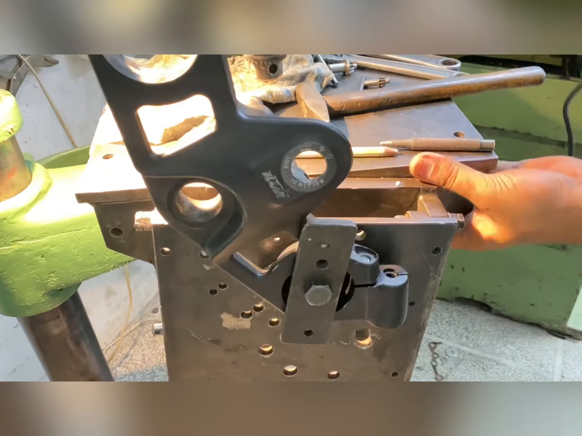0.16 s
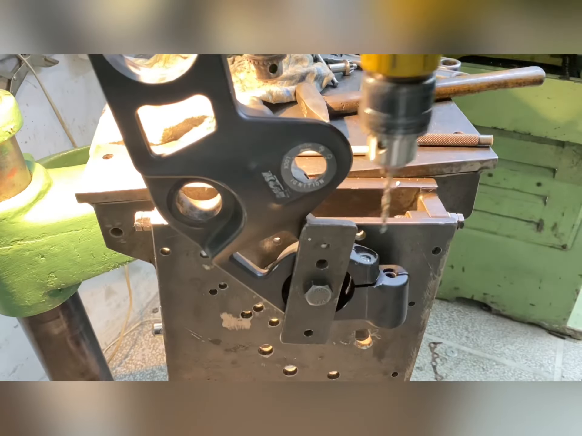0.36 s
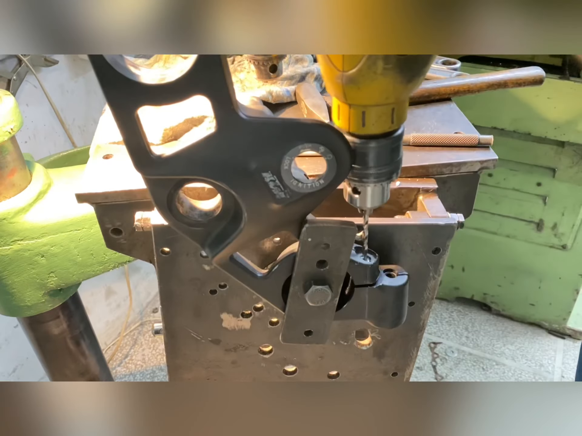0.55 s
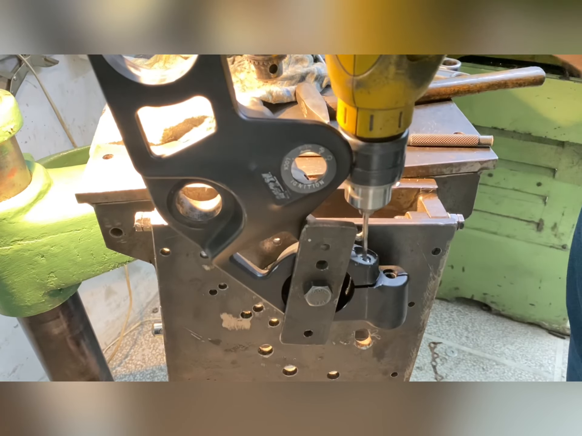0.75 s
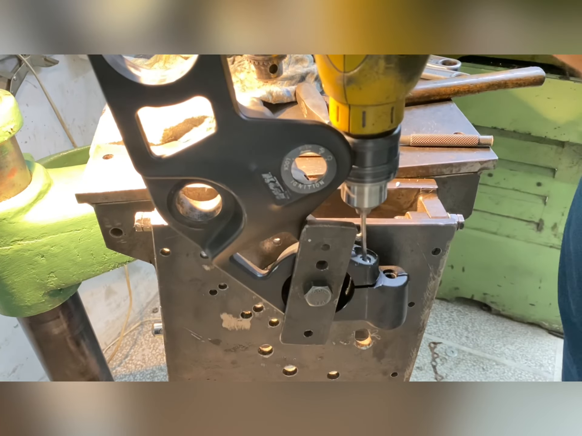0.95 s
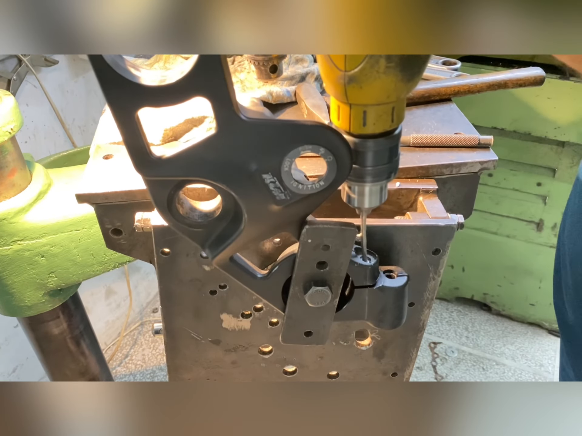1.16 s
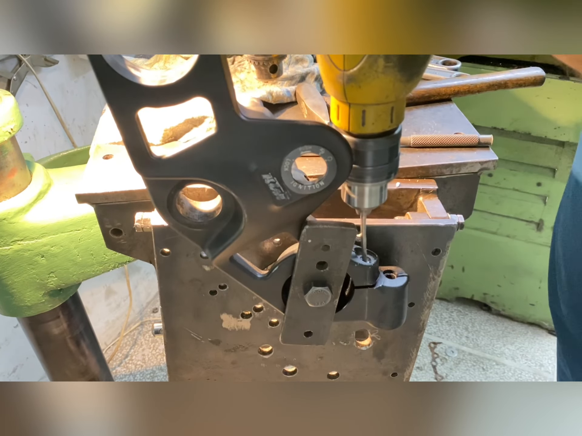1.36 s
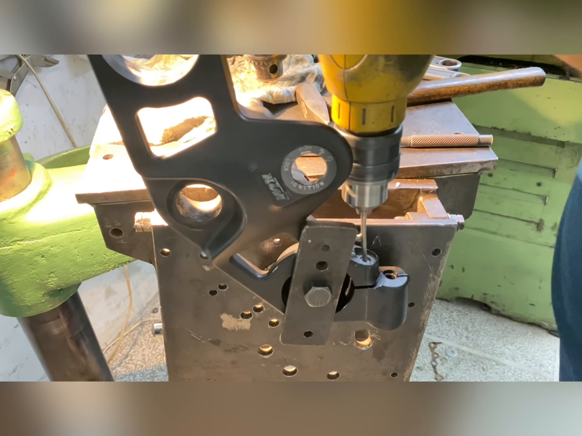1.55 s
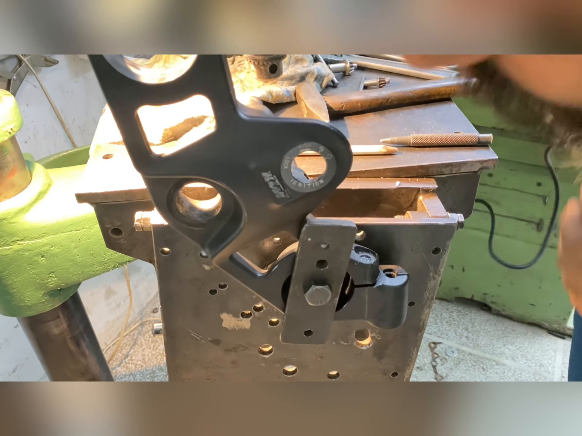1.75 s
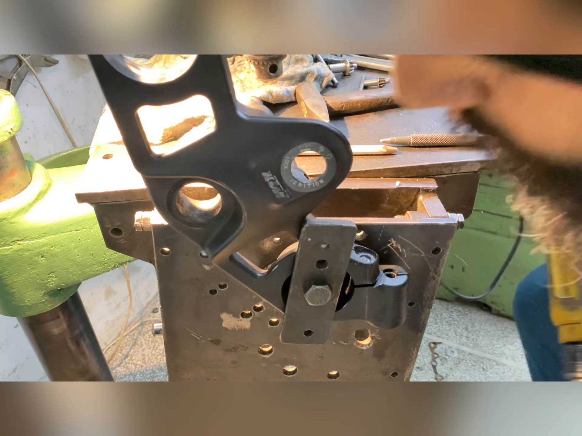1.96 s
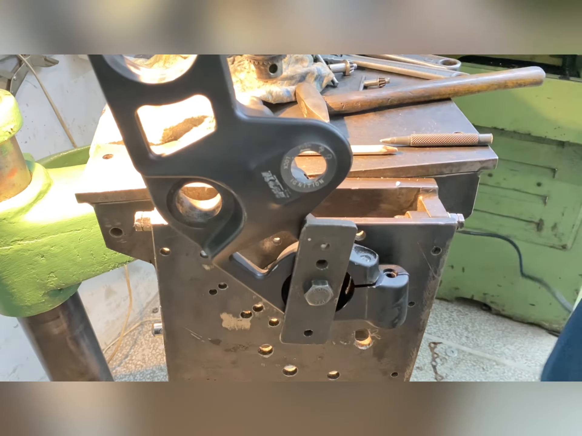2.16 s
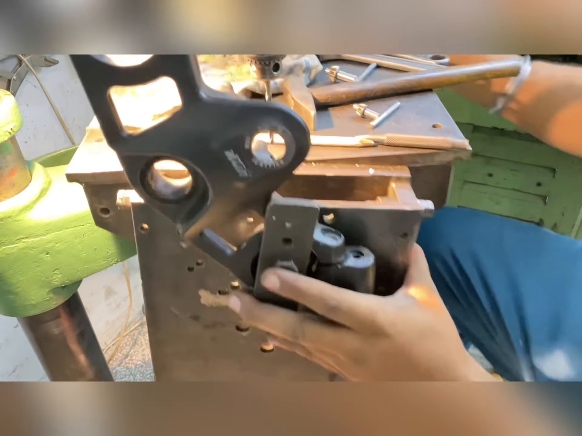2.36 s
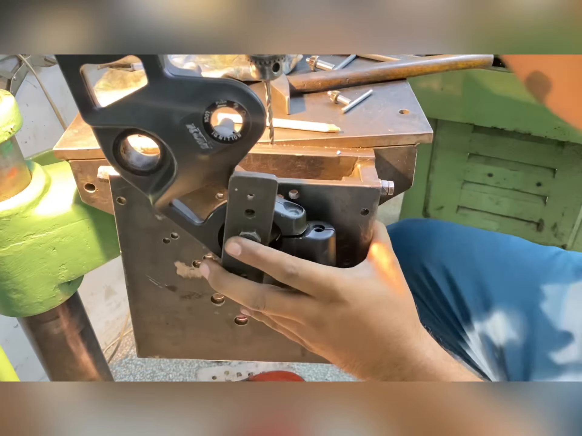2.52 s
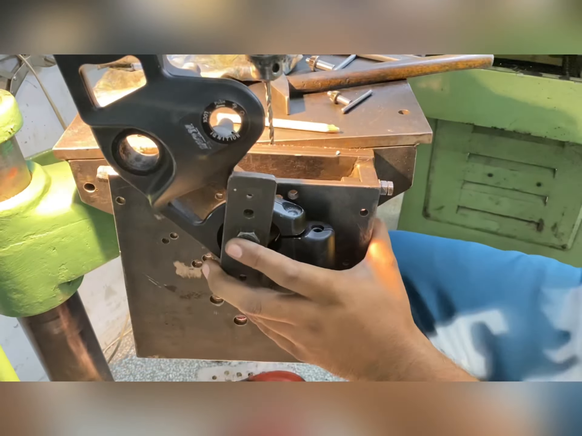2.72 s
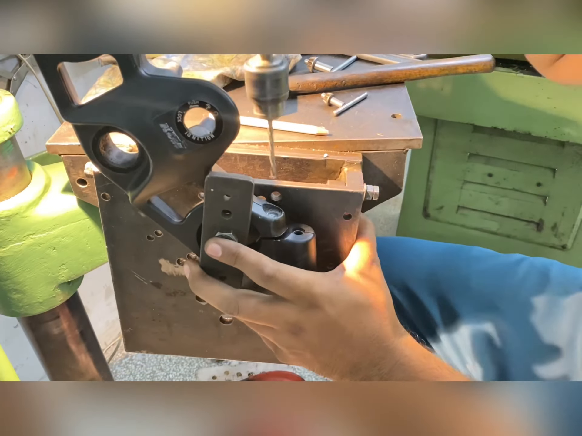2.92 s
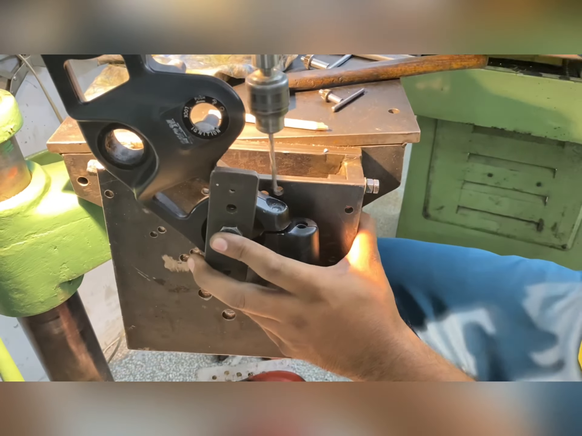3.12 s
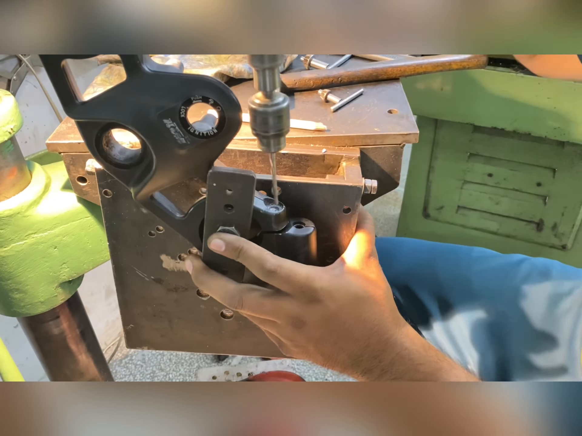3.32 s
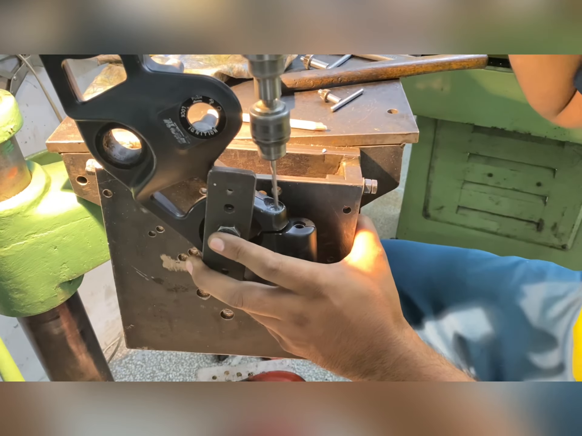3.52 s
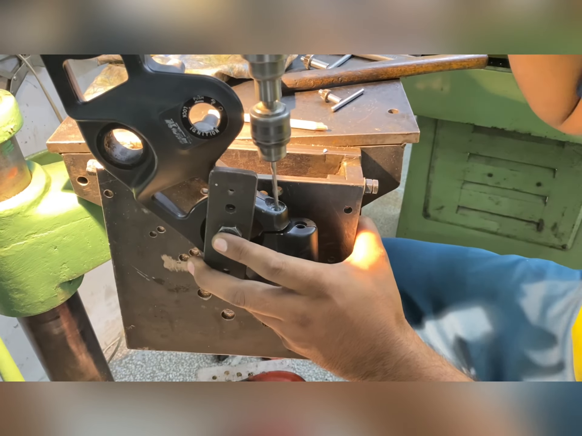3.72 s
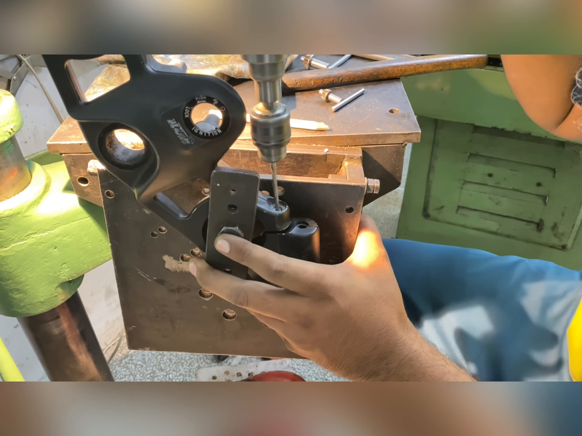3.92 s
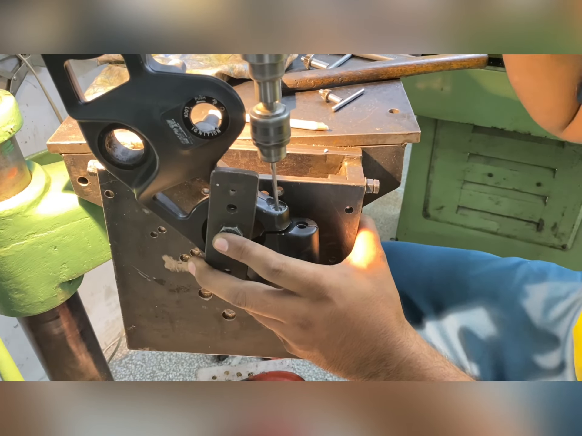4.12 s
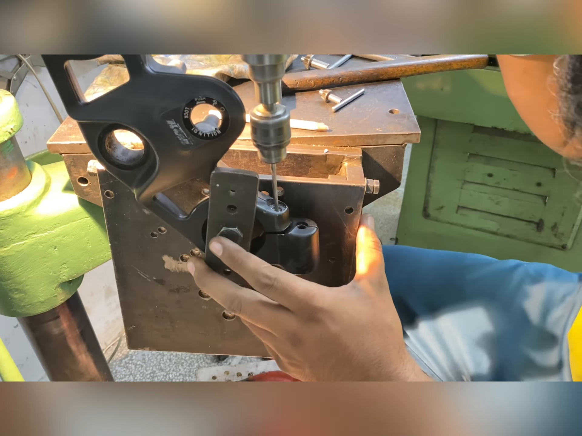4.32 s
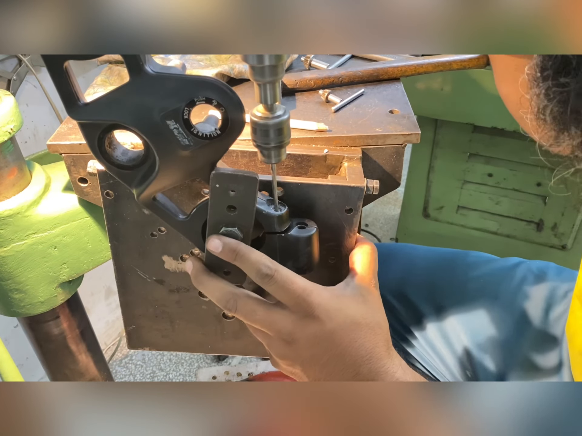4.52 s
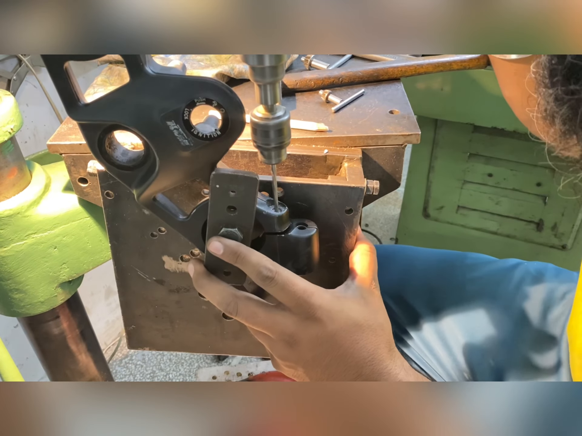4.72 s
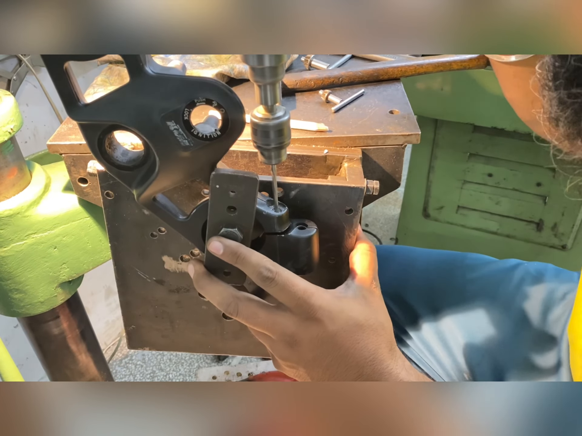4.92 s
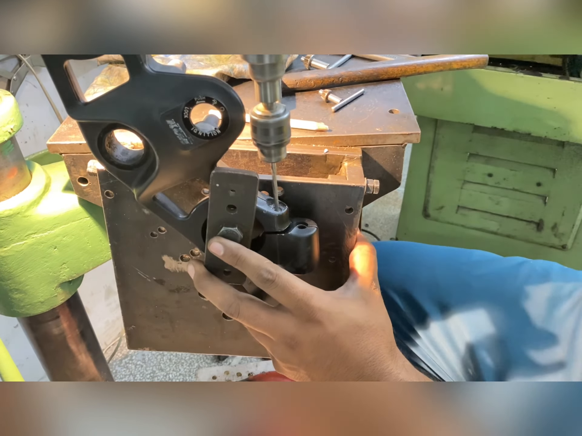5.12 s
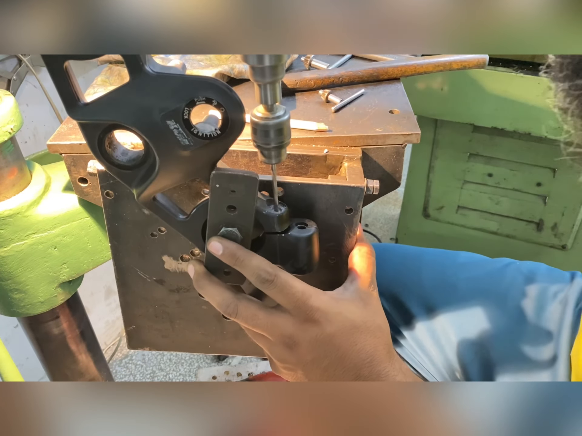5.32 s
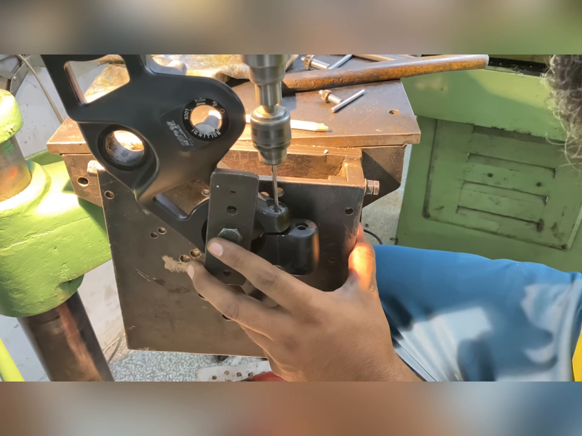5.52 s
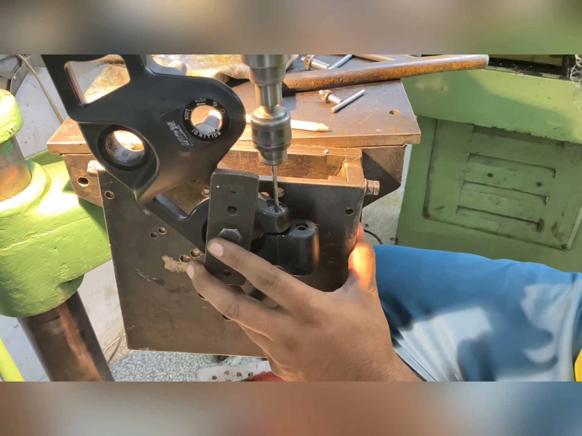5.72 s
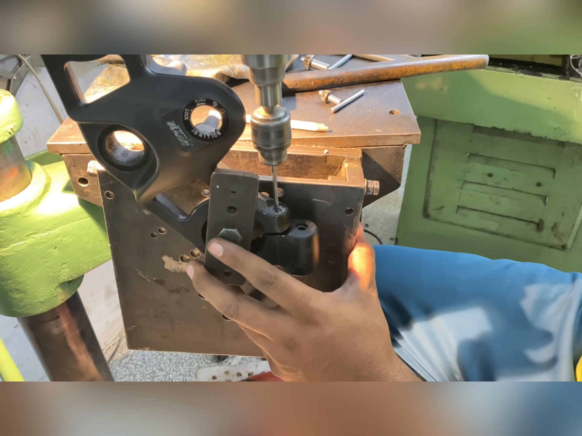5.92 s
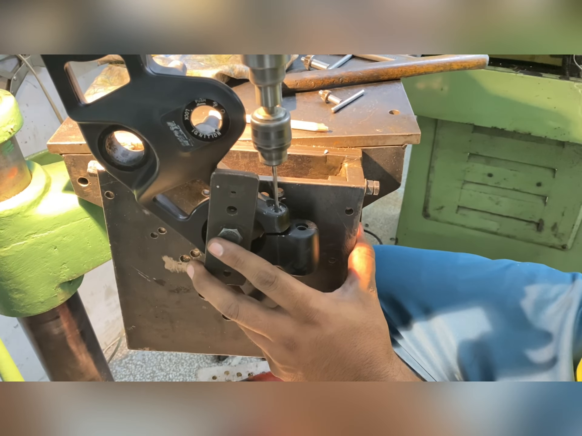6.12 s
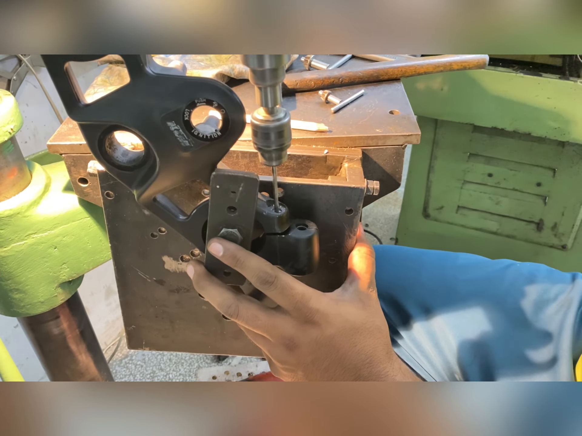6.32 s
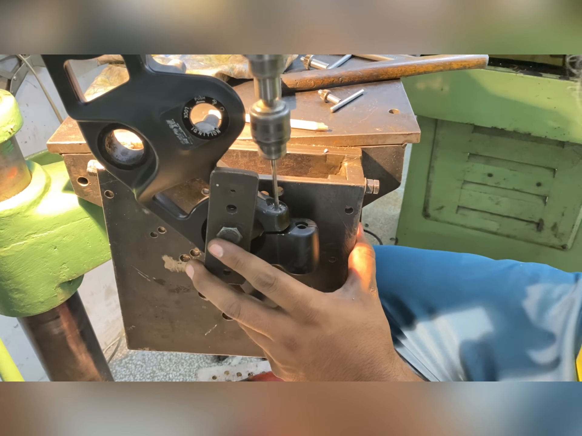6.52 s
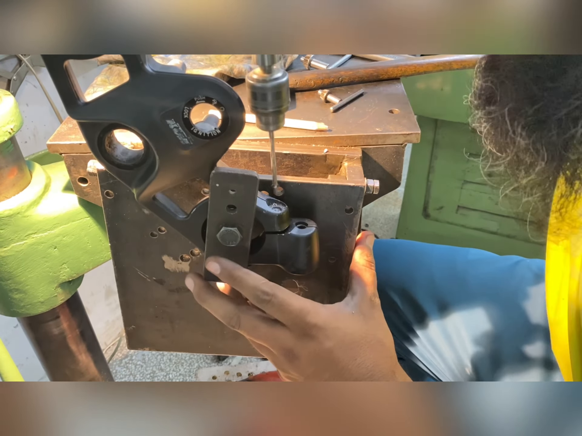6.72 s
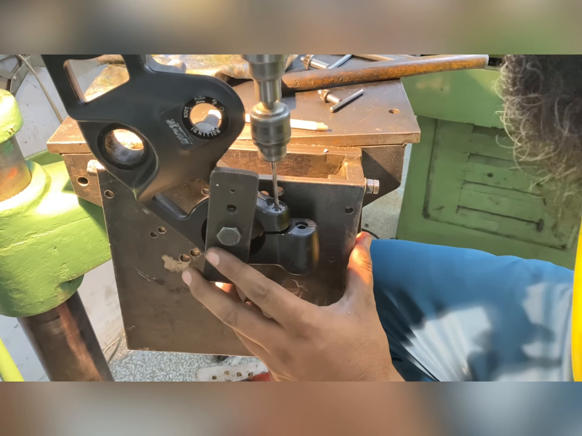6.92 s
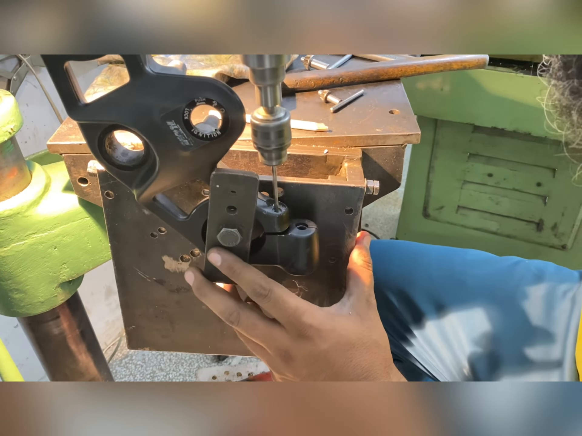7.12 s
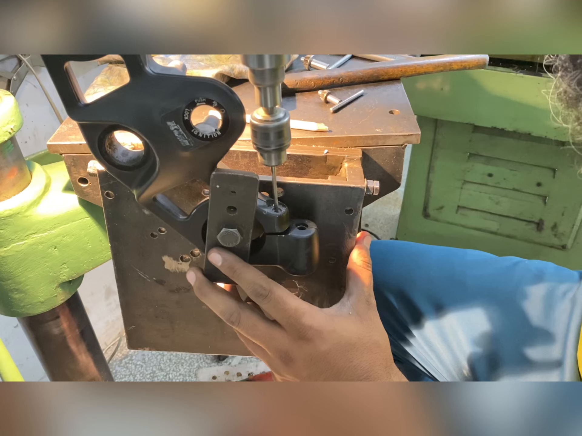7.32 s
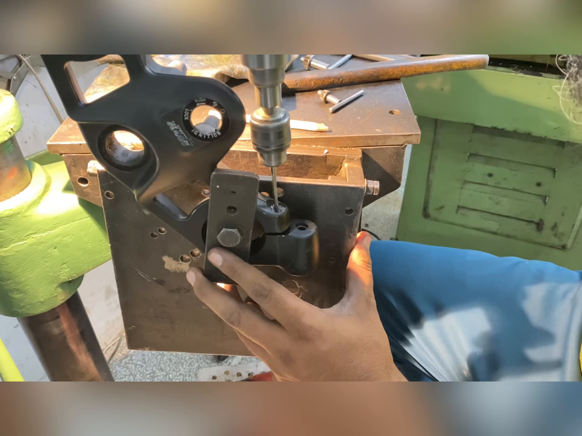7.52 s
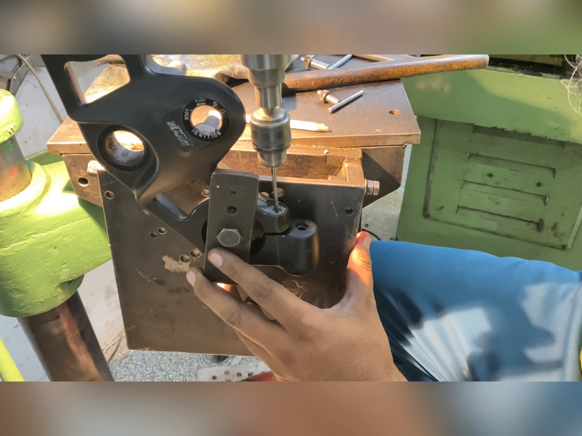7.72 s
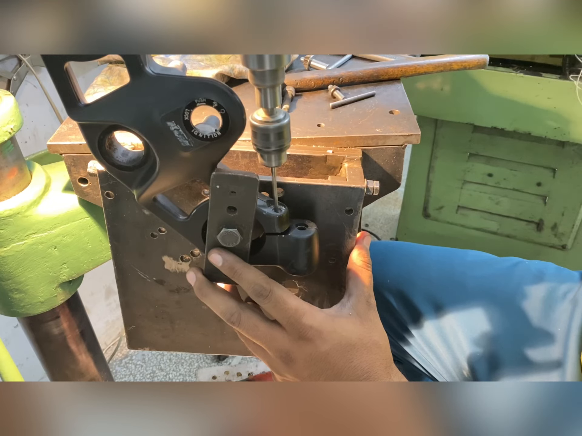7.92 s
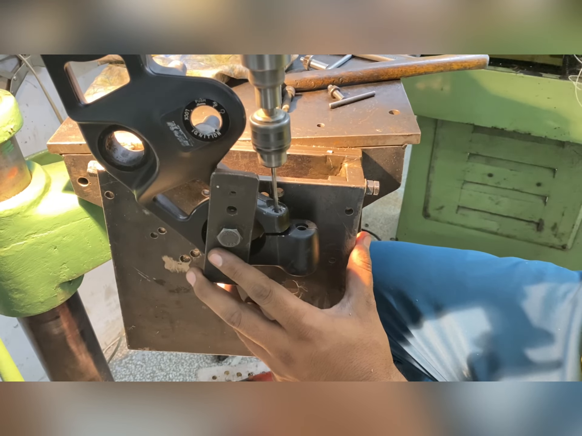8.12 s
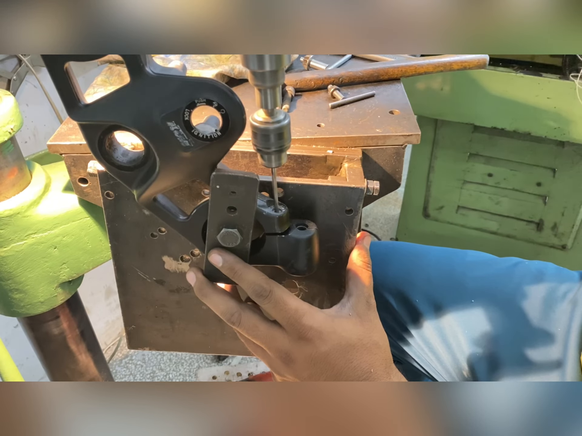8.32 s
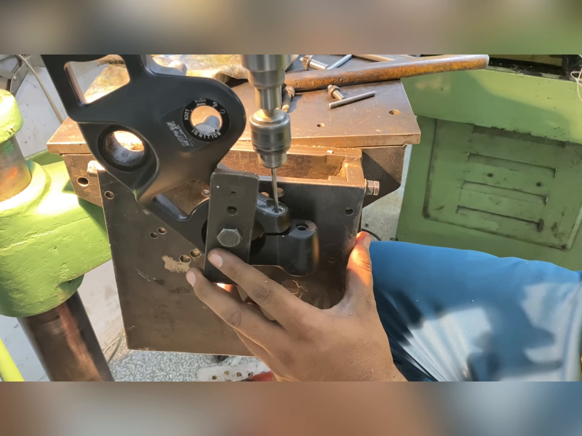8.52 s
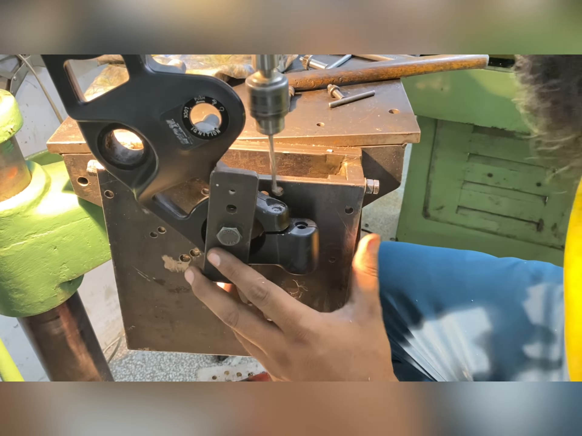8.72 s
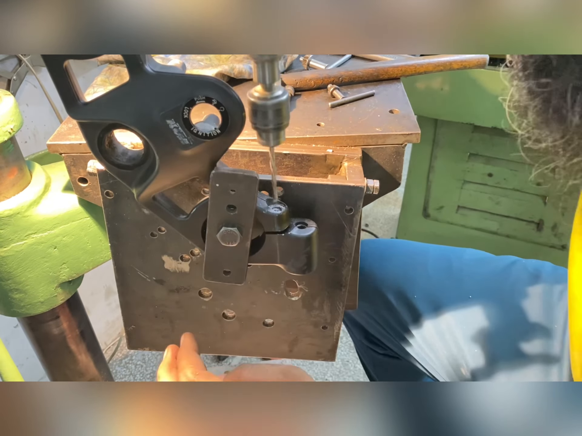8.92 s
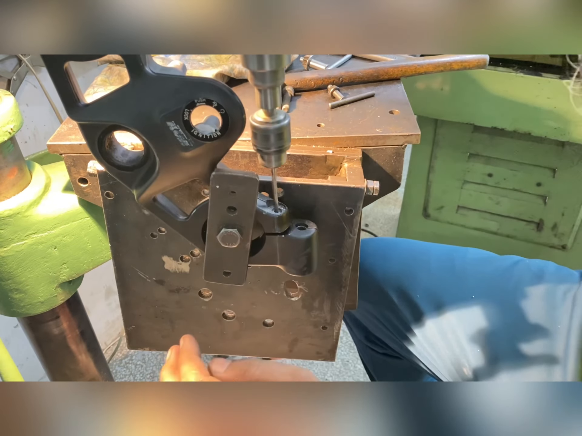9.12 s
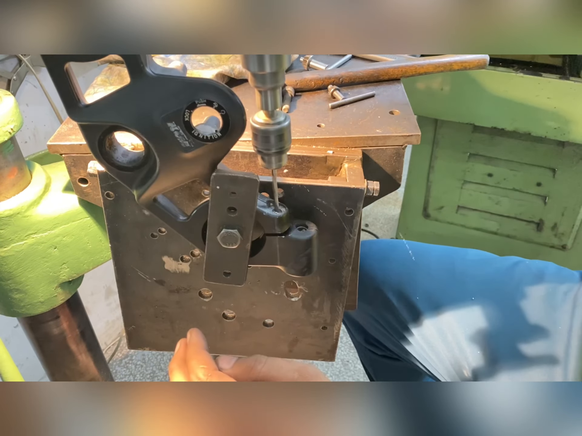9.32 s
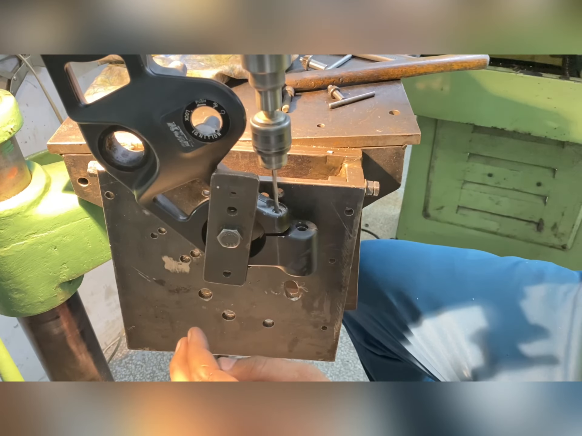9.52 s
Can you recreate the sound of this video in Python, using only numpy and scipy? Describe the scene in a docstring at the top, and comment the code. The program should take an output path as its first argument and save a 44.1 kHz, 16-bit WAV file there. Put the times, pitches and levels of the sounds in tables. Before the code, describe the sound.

Close, bright and nearly dry workshop sound with little bass over a faint, restless background. A tiny scrape and click open it. At about 0.7 s a cordless drill creeps, then snags on steel from 0.8 to 1 s with sharp scratches and squeaks. It spins up into a gritty geared whir with a thin whistle, lets go at 1.6 s and coasts down in pitch until about 2.3 s, with knocks and clicks around 1.8-2.1 s. More clicks come at 2.5-2.7 s; at 2.75 s a switch snaps and a drill press hums steadily, with fine whine and faint belt chirp. Light ticks sound near 4 s, a soft scrape swells from 4.5 s, and sharper ticks come at 5-5.5 s. Loud, shrill, ringing chatter in rapid irregular bites fills 5.7-6.5 s, then 7-8.6 s, then 9.1 s to the end, with the quieter hum between.

```python
"""A bench drill press hums close by: its two-flute bit ticks, scrapes, then chatters in three shrill spells,
each bite being a noise burst that rings the resonances of the bit and the clamped part.
Before it, a cordless drill snags on steel, spins up and coasts: gear noise and tones follow a mesh pitch.
Knocks, clicks and squeaks are short bursts through resonances; a restless shop background lies beneath."""
import sys
import numpy as np
from scipy import signal
from scipy.fft import rfft, irfft, next_fast_len
from scipy.io import wavfile
from scipy.ndimage import uniform_filter1d, map_coordinates

SR = 44100
rng = np.random.default_rng(int(sys.argv[2]) if len(sys.argv) > 2 else 0)


def put_to_file(sound):
    """Save the sound as 16-bit audio at rate SR, in the file named by the first command-line argument."""
    columns = np.atleast_2d(sound).T  # one column per channel
    safe = np.clip(columns, -1, 1)
    whole_steps = np.round(safe * 32767)
    wavfile.write(sys.argv[1], SR, whole_steps.astype(np.int16))


N = 421596
T = np.arange(N) / SR  # time of each sample, s
TOP_HZ = 15800  # upper limit of the tones and of the microphone

# All table levels are relative: the functions below apply further gains.
# Background spectrum: (f/Hz, spectral level/dB)
SHOP_SPECTRUM = [(24, -24), (100, -27), (166, -13), (203, -16.5), (242, -5), (335, -9.5), (567, -6.5),
                 (785, -11.5), (1060, -3.5), (2610, -12), (9000, -14), (12600, -21.5), (15800, -26)]
# Background level over time: (t/s, level/dB)
SHOP_LEVEL = [(0, -46.5), (.65, -44.5), (1.2, -38), (1.8, -44), (2.25, -40.5), (2.55, -42.5), (2.75, -45),
              (3, -47), (9.56, -48.5)]
# Brief dips of the background: (t/s, half length/s, change of level/dB)
SHOP_DIPS = [(2.227, 0.0059, -11), (2.608, 0.038, -9)]
# Steady tones of the shop: (f/Hz, level/dB relative to the background)
SHOP_HUM = [(243, -18), (371, -24.5), (436, -21), (526, -20), (790, -20.5), (872, -21), (1047, -18)]
# Left-right likeness of background, press and clicks: (f/Hz, correlation)
LIKENESS = [(60, 0.74), (150, 1), (380, 0.86), (950, 0.99), (2380, 0.29), (5980, -0.14), (15000, 0.62)]

# Bumps on the table: (t/s, level/dB, length/s, centre f/Hz)
KNOCKS = [(1.773, -37.5, 0.047, 746), (1.949, -37.5, 0.036, 565), (2.054, -35, 0.041, 430),
          (2.566, -31.5, 0.0068, 170)]
# Table resonances: (f/Hz, width/Hz, level/dB)
TABLE_MODES = [(302, 210, -2), (426, 110, 3), (710, 200, -2), (1030, 170, -2), (1415, 110, 3),
               (1760, 140, -9), (2180, 260, -2.5), (2920, 1300, -8)]
KNOCK_FALL_DB_PER_OCTAVE = 5.5  # either side of a blow's centre
# Groans of the fixture under the feed: (t/s, level/dB, length/s, f/Hz, width/Hz)
GROANS = [(3.97, -46, 0.14, 312, 20), (5.502, -39, 0.1, 434.4, 8), (5.516, -42, 0.079, 378, 15)]
# Squeaks of steel sliding on steel: (t/s, level/dB, length/s, f/Hz, width/Hz, glide/Hz)
SQUEAKS = [(.01, -51.5, 0.093, 4890, 250, -250), (0.03, -44, 0.032, 14350, 200, 0),
           (0.092, -49, .055, 14000, 200, 0), (0.778, -22, 0.009, 6740, 400, 1000),
           (0.789, -11, .004, 9200, 100, 0), (0.959, -32, 0.013, 5000, 200, 100),
           (0.794, -23, 0.007, 4950, 250, 100), (0.806, -11.5, 0.0053, 11750, 151.5, 100),
           (0.82, -28, 0.0058, 6470, 202, -250), (0.938, -34.5, 0.062, 3050, 262, -7),
           (2.106, -41.5, .059, 6680, 49, -2), (2.108, -43, .043, 11070, 90, -5),
           (2.695, -43, 0.048, 4600, 200, 445)]
# Sharp steel contacts and the switch: (t/s, level/dB, length/s)
CLICKS = [(.03, -45.5, 0.12), (.363, -41, 0.013), (1.78, -37, 0.025), (1.955, -39, 0.035),
          (2.062, -37.5, 0.026), (2.485, -31, 0.0086), (2.559, -24.5, 0.0062), (2.646, -32, 0.012),
          (2.748, -23, 0.0044), (2.754, -33.5, 0.041), (3.017, -32.5, .005)]
# Broad spectrum of clicks and ticks: (f/Hz, spectral level/dB)
CLICK_SPECTRUM = [(300, -28), (1500, -7), (4500, 4.5), (8000, 3.5), (12000, 2), (15800, 0)]

# Cordless drill's gear tones: (multiple of the mesh pitch, level/dB)
GEAR_ORDERS = [(1, -12.5), (4, -12)]
# Rough, smeared overtone of the gears: (multiple of the mesh pitch, level/dB)
GEAR_BUZZ = [(4.35, -10)]
# Thin whistle of the rotor: (multiple of the mesh pitch, level/dB)
ROTOR_ORDERS = [(8, -53), (12, -43), (24, -47), (36, -55)]
# Spectrum of the gear noise: (f/Hz, spectral level/dB)
GEAR_SPECTRUM = [(180, -48), (300, -32), (360, -25), (469, -35), (527, -26), (839, -42), (1210, -18),
                 (1310, -11), (3610, -2), (4950, 2), (8550, -4.5), (12700, 1.5), (15800, -10)]
# Left-right likeness of the cordless drill: (f/Hz, correlation)
GEAR_LIKENESS = [(60, 0.95), (240, 0.96), (950, 1), (3770, 0.079), (15000, 0.89)]
# The cordless bit catches on the hole's rim: (t/s, level/dB, length/s)
SNAGS = [(.775, -20, 0.012), (.788, -20.5, 0.018), (.806, -28.5, 0.046), (.842, -30, 0.031),
         (.884, -25, 0.02), (.908, -21.5, 0.018), (.938, -24, 0.0081), (.959, -22, 0.017)]
# Resonances excited by the snags: (f/Hz, width/Hz, level/dB)
SNAG_MODES = [(3100, 130, -8.5), (4940, 74, -10), (6100, 140, -15), (7750, 150, -8), (9060, 75, -2),
              (9500, 89, -9), (11560, 110, -2), (11920, 130, 0), (13500, 90, -9), (14800, 100, -13)]
# Broad spectrum of the snags: (f/Hz, spectral level/dB)
SNAG_SPECTRUM = [(400, -18), (1200, -9), (2200, 3), (3100, -7), (3800, -23), (6200, 5.5), (8400, -3),
                 (10000, 7), (12500, 5), (14200, -8), (15800, 0)]
TOUCH_S, SQUEEZE_S, LET_GO_S = .668, 0.98, 1.592  # trigger touched, squeezed fully, let go
# mesh pitch when creeping, pitch that full power pulls towards, spin-up time, sag under load
CREEP_HZ, FREE_HZ, SPIN_UP_S, SAG_HZ_PER_S = 596, 1716, .19, 834
COAST_S, FRICTION_HZ_PER_S = .98, 1755  # time constant of the drag, steady braking by friction
# share by which the gear pitch is lowered during the snags; the gear sound gets quieter with it
SNAG_PITCH_DROP = .34
GEAR_DB, GEAR_DB_PER_OCTAVE, COAST_DROP_DB = -28.5, 7.5, 9.5  # at top pitch; growth; drop without power

# Resonances of the switch's steel housing: (f/Hz, width/Hz, level/dB)
SWITCH_MODES = [(1290, 31, -2), (1400, 27, -2), (2170, 83, -1.5), (2670, 80, -3), (3360, 23, -6)]
# Drill press: (t/s, frame rumble level/dB, motor hum level/dB)
PRESS_LEVELS = [(2.82, -50.5, -49), (3.63, -43.5, -42.5), (4.51, -43, -39.5), (5.0, -42.5, -48),
                (5.09, -44, -38.5), (5.69, -43, -46), (5.73, -55, -50), (6.2, -53, -52.5), (7.04, -48, -43),
                (7.36, -49.5, -51), (7.59, -51, -46), (7.78, -58.5, -54.5), (8.41, -48.5, -52),
                (8.49, -54.5, -52), (9.16, -51, -46), (9.56, -60, -60)]
# Octave of the motor hum: (t/s, level/dB)
OCTAVE_LEVEL = [(2.82, -58), (3.3, -53.5), (3.81, -43.5), (4.25, -58), (5.2, -52.5), (5.69, -55),
                (5.75, -61), (7.1, -52), (8.1, -64), (9.05, -59), (9.56, -58)]
# Spectrum of the frame's rumble: (f/Hz, spectral level/dB)
FRAME_SPECTRUM = [(59, -85), (100, -53), (307, -17), (396, -15), (490, -6), (618, -17.5), (1010, -8.5),
                  (1440, -22), (2160, -12.5), (2350, -13), (5140, -15.5), (6220, -14), (6770, -16),
                  (11300, -20), (15800, -23.5)]
# Resonances of the frame: (f/Hz, width/Hz, level/dB)
FRAME_MODES = [(181, 3.9, -33), (206, 9.1, -17), (250.5, 4.9, -1.5), (276.3, 9, 0), (291, 5.4, -13),
               (303.2, 4.5, -3), (314.7, 7.4, -5), (427, 8, -4.5), (458, 9.6, 3), (555, 16, 0), (828, 8, 0),
               (901, 8.3, -2.5), (1009.5, 17, 1.5), (1168, 16, 0), (1223, 17, 1), (1293, 12, 2.5),
               (1356, 24, 1)]
# Bearing and pulley tones: (f/Hz, level/dB, phase flutter/rad)
WHINES = [(315, -57.5, .2), (736, -58.5, .2), (1814, -61, .3), (2988, -61.5, .8), (6412, -52, .4),
          (7650, -62, 1), (10830, -59, .8), (10885, -58.5, .8), (10965, -60, .8), (11488, -62, 1),
          (11832, -58.5, .7), (12312, -56, .8), (14810, -63, 1.2)]

# Lowering of the bit: (t/s, attack/s, hold/s, release/s, scrape level/dB, sizzle level/dB)
FEEDS = [(3.717, 0.087, .2, 0.19, -49, -45), (4.22, .1, 0.081, 0.11, -43.5, -44),
         (4.464, 0.32, .3, 0.28, -38, -35.5), (5.266, 0.27, .15, .03, -33.5, -33.5),
         (5.726, 0.024, 0.74, 0.071, -39, -40.5), (7.009, .01, 1.615, 0.017, -40.5, -42),
         (9.07, .02, 0.44, .05, -44.5, -44)]
# Resonances of the sizzle: (f/Hz, width/Hz, level/dB)
SKIM_MODES = [(4980, 24, -2), (7870, 94, 1.5), (10070, 260, 0.5), (11450, 260, -0.5), (12340, 120, 6),
              (15100, 250, -12)]
# The turning bit touches the steel: (t/s, level/dB, length/s)
TICKS = [(3.856, -30.5, 0.0028), (3.889, -28, .004), (3.906, -34, 0.0027), (3.973, -31, .003),
         (3.991, -24.5, 0.0042), (4.008, -30, .004), (4.041, -29, 0.0033), (4.988, -18, 0.003),
         (5.458, -23, .004), (5.475, -25, 0.0075), (5.513, -18.5, 0.0037), (5.526, -16, 0.0026)]
# Resonances of the ticks: (f/Hz, width/Hz, level/dB)
TICK_MODES = [(7720, 110, 1), (9840, 280, -2.5), (12400, 72, 6), (14800, 460, -13)]
# The bit grabs until the chip breaks: (t/s, length/s, crest level/dB, place of the crest 0-1,
# second flute's bite as a ratio to the first, scrape between bites 0-1, chatter rate f/Hz)
GRABS = [(5.697, 0.032, -8, 0.94, 0.05, 0.24, 49), (5.747, 0.03, -13.0, 0.85, 0.5, 0.22, 62.6),
         (5.779, 0.04, -16.3, 0.26, 0.9, 0.15, 62), (5.827, 0.022, -14, 0.1, 0.1, 0.2, 70.0),
         (5.854, 0.047, -12, 0.2, 0.54, 0.24, 64.7), (5.914, 0.014, -18, 0.0, 0.55, 0, 70.4),
         (5.961, 0.027, -16, 0.86, 0.05, 0, 50), (5.984, 0.04, -13, 0.89, 0.3, 0, 72.6),
         (6.045, 0.036, -11.3, 0.5, 0.05, 0.32, 57.7), (6.114, 0.064, -14.5, 0.7, 0.53, 0.06, 59),
         (6.209, 0.062, -13, 0.3, 0.4, 0.12, 55.3), (6.279, 0.032, -14, 0.3, 0.2, 0.16, 69),
         (6.326, 0.029, -12, 0, 0.3, 0.2, 63.5), (6.379, 0.035, -15, 0.35, 0.15, 0.18, 60),
         (6.432, 0.032, -15.3, 0.83, 0.67, 0.0, 59), (6.474, 0.02, -14, 1.0, 1.2, 0.0, 57.6),
         (7.0, 0.046, -17, 1.0, 0.43, 0.0, 59.7), (7.051, 0.073, -14.5, 0.85, 0.73, 0.1, 60.5),
         (7.132, 0.13, -14, 0.3, 0.9, 0.26, 60.1), (7.267, 0.036, -16.5, 0.5, 0.29, 0.02, 58.3),
         (7.316, 0.032, -17.0, 0.0, 0.05, 0.1, 61.7), (7.378, 0.018, -13.5, 1.0, 0.19, 0.08, 50.2),
         (7.396, 0.034, -15.5, 0.63, 0.2, 0, 58.9), (7.448, 0.095, -13.5, 0, 0.4, 0.2, 58.5),
         (7.525, 0.14, -11.5, 0.21, 0.8, 0.12, 79), (7.643, 0.052, -12, 0.8, 0.05, 0.08, 58.56),
         (7.731, 0.067, -17, 0.2, 0.05, 0.12, 60.6), (7.826, 0.03, -16, 0.0, 0.15, 0.2, 62.3),
         (7.869, 0.039, -20.5, 0.0, 0.1, 0.19, 52.0), (7.952, 0.084, -15, 0.97, 0.05, 0.11, 60),
         (8.017, 0.12, -12.5, 0.37, 0.05, 0.12, 58.6), (8.126, 0.09, -13.5, 0.95, 0.05, 0.08, 63.5),
         (8.192, 0.031, -16.5, 0.26, 1.17, 0.2, 69.8), (8.246, 0.02, -21, 0.0, 0.47, 0.1, 64.3),
         (8.307, 0.05, -12.7, 0.0, 0.05, 0.03, 52.7), (8.344, 0.079, -14.0, 0.3, 0.3, 0.24, 63),
         (8.429, 0.066, -13, 0.45, 0.67, 0.2, 83.5), (8.505, 0.076, -17.5, 0.2, 0.72, 0.29, 60.4),
         (9.095, 0.008, -24, 0.93, 0.44, 0.1, 59.4), (9.168, 0.069, -13.5, 0.7, 0.86, 0.46, 59.4),
         (9.233, 0.089, -14, 0.03, 1, 0.27, 55.8), (9.322, 0.066, -14.5, 0.75, 1.05, 0.31, 60.2),
         (9.395, 0.085, -15.5, 0.64, 0.43, 0.26, 59.3), (9.483, 0.065, -17.5, 0.9, 0.33, 0.07, 60)]
SWELL_DB_PER_S = 58  # a grab builds up to its crest and eases off at this rate
BITE_S, BITE_DB, BITE_GROWTH = 0.0046, -14.5, 0.3  # bite length at this level; exponent of its growth
# Resonances of the bit and the clamped part: (f/Hz, width/Hz, level/dB)
BIT_MODES = [(1755, 42, -12.5), (1980, 80, -18), (2450, 150, -19), (3040, 120, -15), (3530, 100, -19),
             (4957, 40, -4), (5170, 47, -21), (6050, 74, -20), (6650, 100, -16), (7000, 250, -13),
             (7450, 45, -14), (7710, 65, 2), (7795, 55, -1.5), (8490, 140, -13.5), (9003, 55, 2.5),
             (9755, 50, -12), (10030, 125, -1.5), (11600, 290, -21), (12310, 110, -7.5), (12780, 200, -16),
             (13400, 200, -22)]
# Spectrum of the tearing chips: (f/Hz, spectral level/dB)
CHIP_SPECTRUM = [(600, -23), (1600, -24), (3200, 5.5), (4200, -6), (5600, -7), (6800, -2), (9800, 9),
                 (10600, -4), (12500, 5), (14100, -25), (15800, 0.5)]
# Further resonances excited by the even scrape: (f/Hz, width/Hz, level/dB)
RASP_MODES = [(1814, 69, -3.5), (2705, 140, 4.5), (3105, 280, 4), (4930, 39, 3)]
# Left-right balance of the cut: (f/Hz, level difference/dB)
CUT_BALANCE = [(60, 0.5), (130, -1), (290, -3), (640, 3), (1410, 0), (3100, 3), (6820, 6), (15000, -1)]
# Left-right likeness of the cut: (f/Hz, correlation)
CUT_LIKENESS = [(180, 0.93), (1650, 1), (3000, 0.55), (4970, 0.31), (7700, 0.73), (10000, 0.87),
                (15000, 0.3)]
# Reverberation of the room: (f/Hz, t60/s)
WALLS_T60 = [(200, 0.044), (2000, 0.2), (12000, 0.024)]


def amp(db):
    """Amplitude ratio: 20 dB for each factor of ten."""
    return 10 ** (np.asarray(db) / 20)


def unit(x):
    """Normalisation to an rms value of 1."""
    return x / np.sqrt(np.mean(x ** 2) + 1e-20)


def along(points, hz):
    """Interpolation of (f/Hz, value) points on a logarithmic frequency axis."""
    f, value = np.transpose(points)
    return np.interp(np.log(hz + 1), np.log(f + 1), value)


def curves(rows):
    """Linear interpolation in time of each column after t/s."""
    t, *columns = np.transpose(rows)
    return [np.interp(T, t, column) for column in columns]


def wobble(rate):
    """Random modulation: a smooth curve through rate random knots a second."""
    knots = rng.standard_normal(int(N * rate / SR) + 4)
    return map_coordinates(knots, [T * rate])


def filtered(x, response):
    """Linear filtering: the spectrum is multiplied by a complex response."""
    m = next_fast_len(N + SR // 4)
    return irfft(rfft(x, m) * response(np.fft.rfftfreq(m, 1 / SR)), m)[..., :N]


def modal_sum(f, modes):
    """Modal superposition: the responses of damped resonators add."""
    return sum(amp(db) * 1j * f * w / (c * c - f * f + 1j * f * w) for c, w, db in modes)


def unit_power(h):
    """Power normalisation: white noise keeps its power through this response."""
    return h / np.sqrt(np.mean(abs(h) ** 2))


def ring(x, modes):
    """Resonance: x excites a set of modes."""
    return filtered(x, lambda f: unit_power(modal_sum(f, modes)))


def colour(x, spectrum):
    """Spectral shaping: a broad response that keeps the power of white noise."""
    return filtered(x, lambda f: unit(amp(along(spectrum, f))))


def noise(likeness):
    """Stereo correlation: mid and side noise are mixed to a given left-right likeness."""
    def shares(f):
        angle = np.arccos(np.clip(along(likeness, f), -1, 1)) / 2
        return np.array([np.cos(angle), np.sin(angle)])
    mid, side = filtered(rng.standard_normal((2, N)), shares)
    return np.array([mid + side, mid - side])


def bursts(rows, rise):
    """Transient envelope: (t/s, level/dB, length/s) contacts rise quickly, hold and release."""
    out, t = np.zeros(N + SR), np.arange(SR // 4) / SR
    for s, db, length in rows:
        u = t[:int(3 * length * SR)]
        first = max(round(s * SR), 0)
        out[first:][:len(u)] += amp(db) * (1 - np.exp(-u / rise)) * np.exp(-(u / length) ** 3)
    return out[:N]


def sine(phase):
    """Pure tone of rms 1."""
    return np.sqrt(2) * np.sin(phase)


def tones(hz, orders):
    """Harmonic series: sines on multiples of a moving pitch, below the band limit."""
    phase = 2 * np.pi * np.cumsum(hz) / SR
    return sum(amp(db) * sine(k * phase) * (k * hz < TOP_HZ) for k, db in orders)


def pan(db):
    """Interaural level difference: gains for left and right."""
    return amp([[db / 2], [-db / 2]])


def from_left(x, lead_s):
    """Interaural time difference: the left microphone hears a mono sound first."""
    ears = np.array([[1], [-1]])
    return filtered(x, lambda f: np.exp(1j * np.pi * f * lead_s * ears))


def workshop():
    """Stationary noise: shaped noise and wavering tones share a slightly restless level."""
    level_db, = curves(SHOP_LEVEL)
    dip_db = sum(db * np.exp(-np.abs((T - s) / half) ** 4) for s, half, db in SHOP_DIPS)
    hum = sum(amp(db + 2.6 * wobble(8)) * sine(2 * np.pi * hz * T + 0.62 * wobble(22))
              for hz, db in SHOP_HUM)
    air = amp(-1.28) * colour(noise(LIKENESS), SHOP_SPECTRUM)
    return amp(level_db + dip_db + 0.49 * wobble(7)) * (air + hum)


def rubbed(s, db, length, hz, width, glide=0, rise=0.0036):
    """Friction-excited resonance: the wider the mode, the faster its phase strays."""
    stray = np.cumsum(rng.standard_normal(N)) * np.sqrt(2 * np.pi * width / SR)
    pitch_hz = hz + glide * np.clip((T - s) / length, 0, 1)
    return bursts([(s, db, length)], rise) * sine(2 * np.pi * np.cumsum(pitch_hz) / SR + stray)


def knock(s, db, length, centre_hz):
    """Impact excitation: a noisy blow favours the table modes around its centre frequency."""
    def response(f):
        octaves_away = abs(np.log2((f + 1) / centre_hz))
        return unit_power(modal_sum(f, TABLE_MODES) * amp(-KNOCK_FALL_DB_PER_OCTAVE * octaves_away))
    return filtered(bursts([(s, db, length)], rise=0.0023) * rng.standard_normal(N), response)


def handling():
    """Impact and friction: knocks on the table, groans, steel clicks and small squeaks."""
    knocks = sum(knock(*row) for row in KNOCKS)
    groans = sum(rubbed(*row) for row in GROANS)
    squeaks = sum(rubbed(*row, rise=0.0012) for row in SQUEAKS)
    clicks = colour(bursts(CLICKS, rise=0.00021) * noise(LIKENESS), CLICK_SPECTRUM)
    return knocks + groans + (squeaks + clicks) * pan(2.5)


def gear_pitch():
    """Motor dynamics: the mesh pitch creeps, spins up, sags under load and coasts; level follows pitch."""
    driven_s = np.clip(T, SQUEEZE_S, LET_GO_S) - SQUEEZE_S
    coasting_s = np.maximum(T - LET_GO_S, 0)
    hz = FREE_HZ - (FREE_HZ - CREEP_HZ) * np.exp(-driven_s / SPIN_UP_S) - SAG_HZ_PER_S * driven_s
    # drag decays the pitch exponentially, while friction brings it to a full stop
    braking_hz = FRICTION_HZ_PER_S * COAST_S
    hz = (hz + braking_hz) * np.exp(-coasting_s / COAST_S) - braking_hz
    # the gear pitch is lower, and the gear sound quieter, during the snags
    during_snags = uniform_filter1d(1. * ((T > SNAGS[0][0]) & (T < SNAGS[-1][0])), size=3000)
    started = np.clip((T - TOUCH_S) / .015, 0, 1)
    hz = np.maximum(hz * (1 - SNAG_PITCH_DROP * during_snags) * started, 1)
    growth_db = GEAR_DB_PER_OCTAVE * np.log2(hz / hz.max())
    return hz, GEAR_DB + growth_db - COAST_DROP_DB * (1 - np.exp(-coasting_s / 0.05))


def rotor_whistle(mesh_hz):
    """High orders of rotation: a fluttering treble whistle of the free bit, louder under power."""
    free = np.clip((T - SNAGS[-1][0]) / 0.11, 0, 1) * np.clip(mesh_hz / 450, 0, 1)
    powered = np.interp(T, [LET_GO_S, LET_GO_S + 0.073], [1, 0])
    unsteady_hz = mesh_hz * (1 + .011 * wobble(700))
    rotor = tones(unsteady_hz, ROTOR_ORDERS) * amp(8 * powered - 5 + 3 * wobble(50))
    treble = lambda f: np.clip(f / 9000, 0, 1) ** 4 / (1 + (f / 15000) ** 16)
    return free * filtered(rotor, treble)


def bit_snags():
    """Transient excitation: rough catches on the hole's rim ring resonances and a broad spectrum."""
    scratch = bursts(SNAGS, rise=0.0014) * noise(GEAR_LIKENESS) * unit(amp(1.9 * wobble(300)))
    return 0.92 * ring(scratch, SNAG_MODES) + 0.55 * colour(scratch, SNAG_SPECTRUM)


def cordless_drill():
    """Gear meshing: noise and tones follow the mesh pitch; at first the bit snags."""
    mesh_hz, level_db = gear_pitch()
    # the hand presses the running bit into the hole
    leaning = np.interp(T, [1.15, 1.58, 1.68], [0, 1, 0])
    rattle = noise(GEAR_LIKENESS) * unit(amp(1.2 * wobble(500)))
    grind = amp(1.45) * colour(rattle, GEAR_SPECTRUM)
    grind = grind + amp(-6.5) * leaning * ring(noise(GEAR_LIKENESS), BIT_MODES)
    relative_pitch = mesh_hz / mesh_hz.max()
    unsteady_hz = mesh_hz * (1 + .003 * wobble(500) + .003 * wobble(30))
    gears = relative_pitch ** 2 * tones(unsteady_hz, GEAR_ORDERS) * amp(1.2 * wobble(40))
    buzz = relative_pitch ** 2 * tones(mesh_hz * (1 + .06 * wobble(600)), GEAR_BUZZ)
    body = amp(level_db) * (grind + gears + buzz) * pan(0.24)
    return body + rotor_whistle(mesh_hz) + bit_snags() * pan(2.1)


def switch(s=2.751, db=-33, length=0.031):
    """Impact excitation: the press's switch snaps on and rings its housing."""
    return ring(bursts([(s, db, length)], rise=0.0016) * noise(LIKENESS), SWITCH_MODES)


def drill_press(start=2.765, hum_hz=498.0, chirp_hz=2225):
    """Forced vibration: the motor hums and shakes the frame, bearings whine, the belt chirps each lap."""
    rumble_db, hum_db = curves(PRESS_LEVELS)
    octave_db, = curves(OCTAVE_LEVEL)
    running = np.clip((T - start) / 0.01, 0, 1)
    lap = np.cos(2 * np.pi * 5.085 * (T - 2.898))  # belt laps a second
    shake = noise(LIKENESS) * unit(amp(1.56 * wobble(180) + .5 * lap))
    rumble = amp(5.5) * colour(shake, FRAME_SPECTRUM)
    frame = amp(rumble_db) * (rumble + amp(0.5) * ring(noise(LIKENESS), FRAME_MODES))
    hum = tones(hum_hz * (1 + 0.001486 * wobble(6)), [(1, hum_db + .4), (2, octave_db)])
    whine = sum(amp(db) * sine(2 * np.pi * hz * T + flutter * wobble(70)) for hz, db, flutter in WHINES)
    rubbing = np.clip(lap + .35, 0, 1)
    chirp = amp(-48.5) * rubbing * np.sin(2 * np.pi * chirp_hz * T + 0.062 * wobble(82))
    # whine and chirp follow half the rumble's change in dB
    strain = amp(.5 * (rumble_db - np.mean(rumble_db)))
    singing = from_left(hum + strain * (whine + chirp), lead_s=.00003)
    return running * (frame * pan(0.93) + singing * pan(1))


def feed_pressure():
    """Contact force: strengths of the even scrape and the sizzle while the bit is held on the steel."""
    scrape, sizzle = np.zeros((2, N))
    for s, attack, hold, release, scrape_db, sizzle_db in FEEDS:
        pressure = np.interp(T, s + np.cumsum([0, attack, hold, release]), [0, 1, 1, 0])
        scrape = scrape + amp(scrape_db) * pressure
        sizzle = sizzle + amp(sizzle_db) * pressure
    return scrape, sizzle


def skimming():
    """Friction noise: light contact gives a thin, grainy sizzle."""
    _, sizzle = feed_pressure()
    grains = noise(CUT_LIKENESS) * unit(amp(3.0 * wobble(150)))
    return sizzle * ring(grains, SKIM_MODES) * pan(2.4)


def ticking():
    """Impact excitation: a flute's tip just catches the steel, a tiny crack and a brief, high ring."""
    catch = bursts(TICKS, rise=0.00053) * noise(CUT_LIKENESS)
    return (amp(-0.5) * ring(catch, TICK_MODES) + amp(-5.5) * colour(catch, CLICK_SPECTRUM)) * pan(3.7)


def flute_bites(scatter_s=0.00023, scatter_db=0.63, length_scatter=0.11):
    """Chatter: in each grab two flutes bite in turn, twice a chatter period, and drag in between."""
    bites, dragging = [], np.zeros(N)
    chance = rng.standard_normal((len(GRABS), 64, 3))
    for (s, length, crest_db, crest, second, drag, chatter_hz), luck in zip(GRABS, chance):
        level_db = lambda t: crest_db - SWELL_DB_PER_S * abs(t - s - crest * length)
        held = slice(int(s * SR), int((s + length) * SR))
        dragging[held] = drag * amp(level_db(T[held]))
        second_db = 20 * np.log10(max(second, .05))
        times = np.arange(s, s + length, .5 / chatter_hz)
        for k, (at, (late, size, long)) in enumerate(zip(times, luck)):
            bite_db = level_db(at) + (second_db if k % 2 else 0)
            # stronger bites last longer
            bite_s = BITE_S * amp(BITE_GROWTH * (bite_db - BITE_DB)) * np.exp(length_scatter * long)
            bites.append((at + scatter_s * late, bite_db + scatter_db * size, bite_s))
    return np.hypot(bursts(bites, rise=0.0015), dragging)


def cutting():
    """Chip formation: the scraping or chattering force tears chips, which hiss and ring the steel."""
    scrape, _ = feed_pressure()
    force = np.hypot(scrape, flute_bites())
    tearing = force * noise(CUT_LIKENESS) * unit(amp(2.4 * wobble(1500)))
    steel = amp(-2.0) * ring(tearing, BIT_MODES) + amp(-11.0) * colour(tearing, CHIP_SPECTRUM)
    rasp = amp(-5.0) * ring(scrape * noise(CUT_LIKENESS), RASP_MODES)
    halves = np.array([.5, -.5])[:, None]
    return filtered(steel + rasp, lambda f: amp(halves * along(CUT_BALANCE, f)))


def walls(x):
    """Reverberation: each frequency of the room's noise-like response decays with its own t60."""
    hz, t, z = signal.stft(rng.standard_normal((2, SR // 3)), SR, nperseg=256)
    decay = amp(-60 * t / along(WALLS_T60, hz)[:, None])
    tail = signal.istft(z * decay, SR, nperseg=256)[1]
    delayed = np.pad(x, ((0, 0), (200, 0)))  # samples before the room answers
    return signal.fftconvolve(delayed, tail / np.linalg.norm(tail[0]), axes=1)[:, :N]


def scene():
    """Superposition: tools and handling with their room, plus the press and the shop."""
    work = cordless_drill() + skimming() + ticking() + cutting() + handling() + switch()
    room = amp(-14) * walls(work)
    return work + room + drill_press() + workshop()


def record(dry, low_hz=216, ceiling=0.38):
    """Transduction: the microphone rounds high peaks, cuts the bass steeply and is band-limited."""
    rounded = dry / (1 + (dry / ceiling) ** 4) ** (1 / 4)
    bass_cut = lambda f: np.maximum(1 / np.sqrt(1 + (low_hz / (f + 1)) ** 8), amp(-15.5))
    return filtered(rounded, lambda f: bass_cut(f) * (f < TOP_HZ))


dry = scene()
out = record(dry)
put_to_file(out)
```